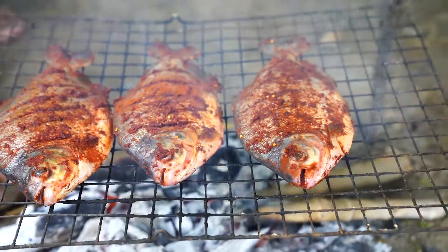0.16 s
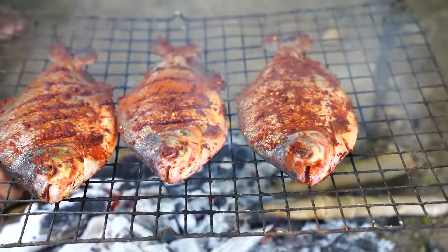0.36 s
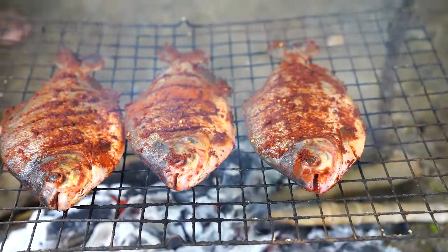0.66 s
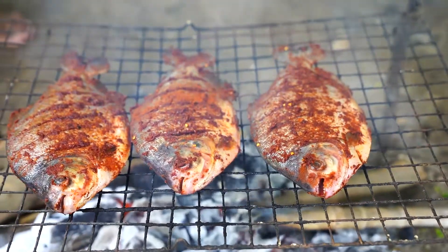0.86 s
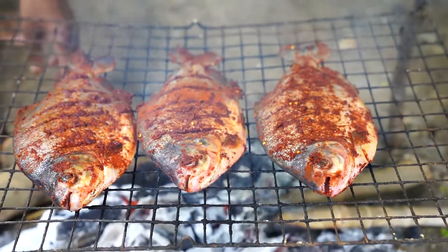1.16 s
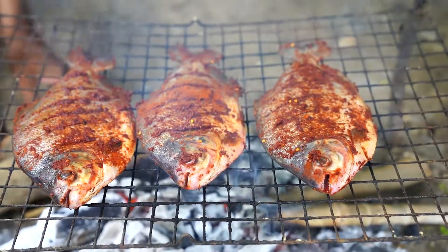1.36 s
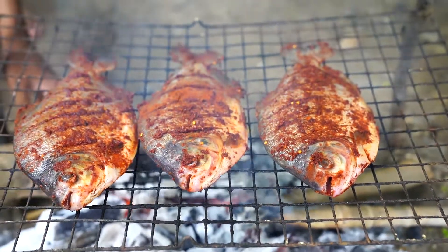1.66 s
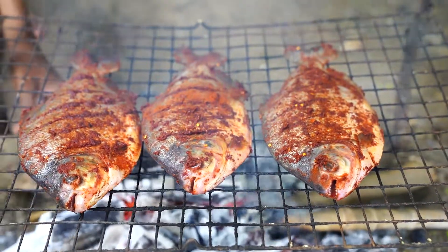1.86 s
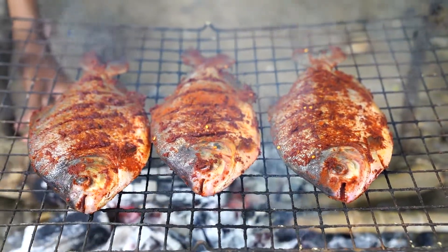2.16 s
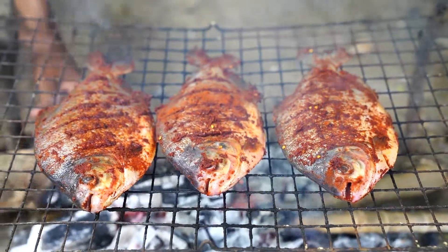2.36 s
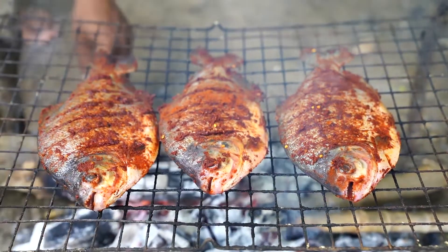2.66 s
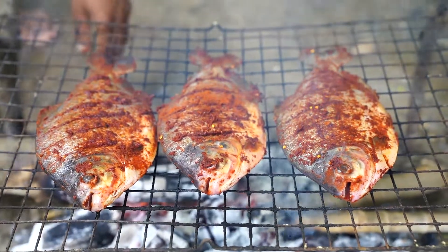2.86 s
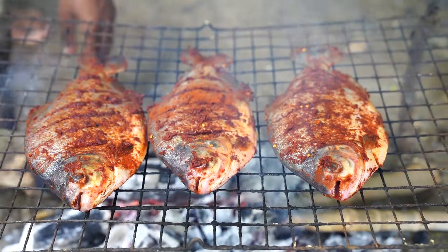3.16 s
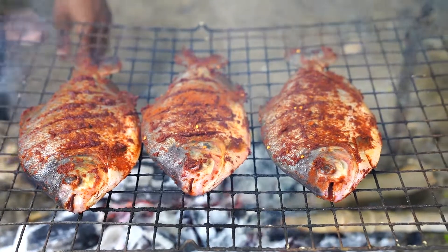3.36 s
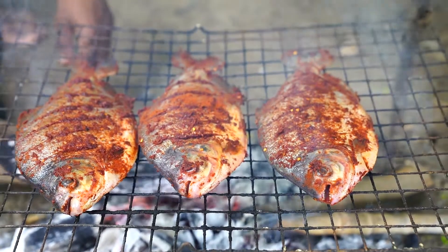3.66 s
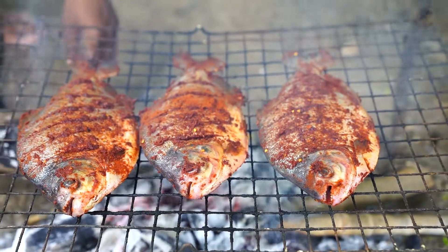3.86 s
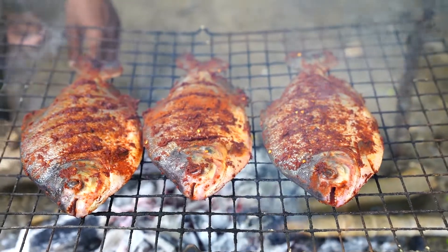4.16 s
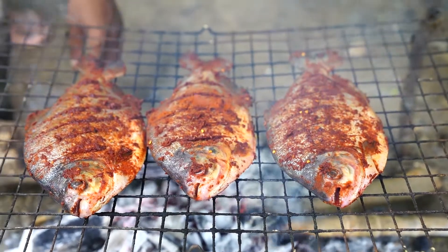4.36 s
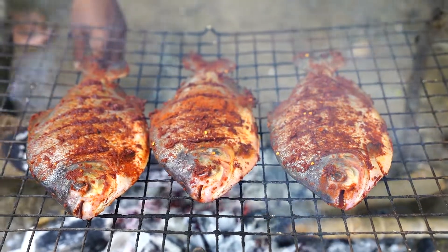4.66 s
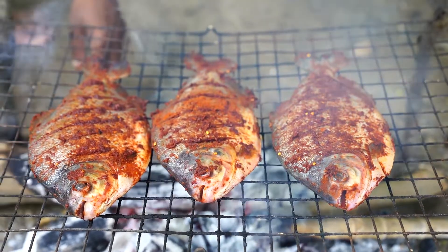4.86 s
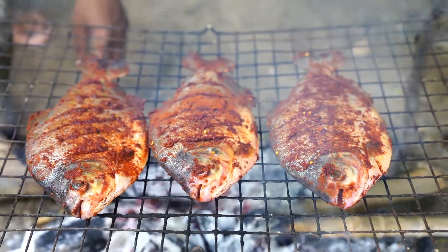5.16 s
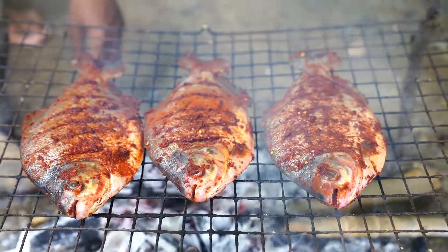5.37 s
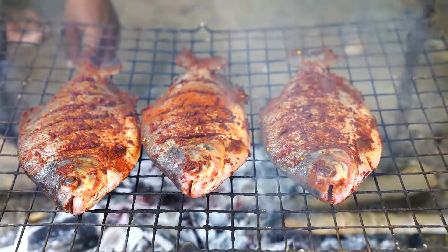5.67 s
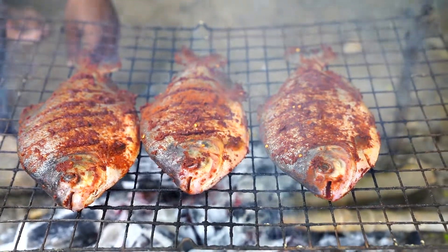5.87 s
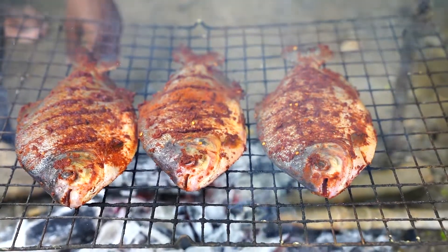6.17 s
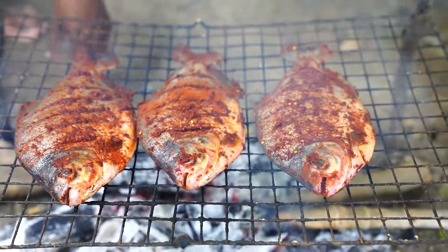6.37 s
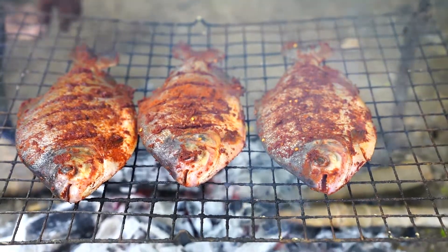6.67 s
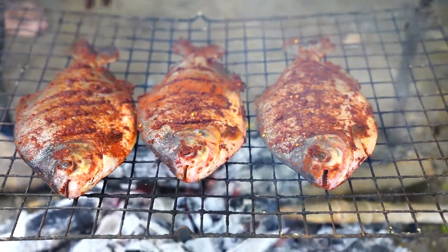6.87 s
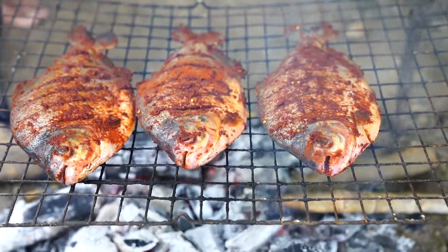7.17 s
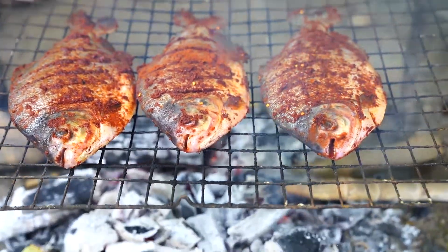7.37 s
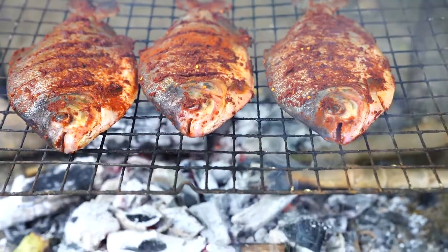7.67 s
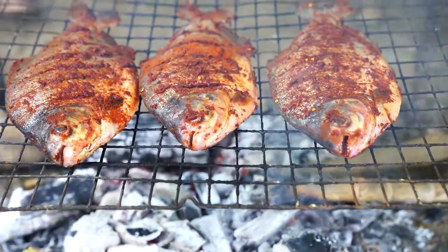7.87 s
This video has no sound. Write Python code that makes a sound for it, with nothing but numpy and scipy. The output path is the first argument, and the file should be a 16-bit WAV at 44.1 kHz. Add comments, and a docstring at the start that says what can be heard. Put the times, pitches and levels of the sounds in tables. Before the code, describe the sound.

Fish grill over charcoal outdoors with a fine, even hiss, faint ticks and scattered sharp cracks close to the microphone. After about a second someone shuffles behind the grill, soles grinding dry grit between soft thuds. Midway a foot knocks on wood, and a few more steps follow. An engine idles some way off, far motors drone, a bird whistles faintly and air rumbles on the microphone.

```python
"""A fine, even hiss and ticks come from coals and fat as fish grill over charcoal outdoors.
Air rumbles at the microphone, an engine idles some way off, far motors drone, a bird whistles faintly.
Someone shuffles behind the grill: soles grind the dry grit, steps thud, and a foot knocks on wood.
Sharp cracks and snaps come from the coals and from grit underfoot; each rings briefly."""
import sys
import numpy as np
from scipy import signal
from scipy.fft import rfft, irfft, next_fast_len
from scipy.io import wavfile
from scipy.ndimage import uniform_filter1d, map_coordinates

SR = 44100
rng = np.random.default_rng(int(sys.argv[2]) if len(sys.argv) > 2 else 0)


def wav_out(sig):
    """Save sig, one row per channel (or a flat mono array), as 16-bit PCM at SR to the path in sys.argv[1]."""
    wavfile.write(sys.argv[1], SR, np.round(np.clip(np.atleast_2d(sig).T, -1, 1) * 32767).astype(np.int16))


N = 353373


def amp(db):
    """Turn decibels into a gain."""
    return 10 ** (np.asarray(db) / 20)


def unit(x):
    """Scale x to an average strength (rms) of 1."""
    return x / np.sqrt(np.mean(x ** 2) + 1e-20)


def along(points, hz):
    """Read between (f/Hz, value) points on a log frequency axis."""
    f, v = np.transpose(points)
    return np.interp(np.log(hz + 1), np.log(f + 1), v)


def clock():
    """The time of every sample, in seconds."""
    return np.arange(N) / SR


def curves(rows):
    """Join rows of (t/s, values...) with straight lines: one curve for each value column."""
    s, *cols = np.transpose(rows)
    return [np.interp(clock(), s, c) for c in cols]


def wobble(rate):
    """A smooth random curve through `rate` points a second."""
    return map_coordinates(rng.standard_normal(int(N * rate / SR) + 4), [clock() * rate])


def filtered(x, response):
    """Filter x by a function that gives the gain at each frequency."""
    m = next_fast_len(N + SR // 2)
    return irfft(rfft(x, m) * response(np.fft.rfftfreq(m, 1 / SR)), m)[..., :N]


def coloured(x, spectrum):
    """Shape x by (f/Hz, level/dB) points, then scale it to rms 1."""
    return unit(filtered(x, lambda hz: amp(along(spectrum, hz))))


def noise(spectrum):
    """Steady noise shaped by (f/Hz, level/dB) points, at rms 1."""
    return coloured(rng.standard_normal(N), spectrum)


def resonance(f, hz, width_hz):
    """The response of something that rings near hz and falls off steeply on both sides."""
    return (1j * f * width_hz / (hz ** 2 - f ** 2 + 1j * f * width_hz)) ** 2


def ring(push, hz, width_hz):
    """Send a short push through one resonance; the result has rms 1."""
    f = np.fft.rfftfreq(len(push), 1 / SR)
    return unit(irfft(rfft(push) * resonance(f, hz, width_hz)))


def pulse(spectrum, size=8192):
    """The most sudden pulse that has the given spectrum (minimum phase)."""
    f = np.fft.rfftfreq(size, 1 / SR)
    cepstrum = irfft(np.log(amp(along(spectrum, f))))
    cepstrum[1:size // 2] *= 2
    cepstrum[size // 2 + 1:] = 0
    return irfft(np.exp(rfft(cepstrum)))


def grains(rate, spread_db):
    """Tiny random clicks of uneven size, about `rate` a second, at rms 1."""
    clicks = (rng.random(N) < rate / SR) * rng.standard_normal(N)
    return unit(clicks * amp(spread_db * rng.standard_normal(N)))


def patchy(x, depth_db):
    """Give x brief random resonances, as the points of contact change."""
    spectra = signal.stft(x, nperseg=512)[2]
    patches = uniform_filter1d(rng.standard_normal(spectra.shape), size=6, axis=0)
    patches = unit(uniform_filter1d(patches, size=5, axis=1))
    return unit(signal.istft(spectra * amp(depth_db * patches), nperseg=512)[1][:N])


def add(track, s, sound):
    """Mix a sound into a track, starting at s seconds."""
    part = track[max(round(s * SR), 0):][:len(sound)]
    part += sound[:len(part)]


def air(calm_db=-30, gust_half_s=0.15, wash_db=-44):
    """Gusts buffet the microphone over a far wash of traffic and breeze."""
    # gusts: t/s, rise over the calm/dB
    gusts = [(.4, 11), (1.2, 8), (3.12, 6), (4.6, 8), (7.28, 9), (7.82, 12)]
    # tone of the rumble at the microphone: f/Hz, level/dB
    rumble_tone = [(4, -18.5), (10, -3), (13.5, -2), (18, -12), (28, -23), (40, -27), (70, -36.5),
                   (150, -76)]
    # narrow resonances that sing in the traffic noise: f/Hz, width/Hz, level/dB
    drone_notes = [(697.6, 35, 2.5), (790, 50, -1.5), (1555, 100, -10.5)]
    # how loud they are together: t/s, level/dB
    drone_level = [(0, -67), (4, -62.5), (5.2, -65), (8, -58)]
    # tone of the far traffic and breeze: f/Hz, level/dB
    wash_tone = [(20, -5), (55, 3), (110, -1.5), (190, -2.5), (300, -6.5), (420, -15.5), (560, -17),
                 (720, -17.5), (1000, -20.5), (1500, -26), (2200, -28), (6000, -33.5)]
    gust_db = sum(db * np.exp(-((clock() - s) / gust_half_s) ** 2) for s, db in gusts)
    rumble = amp(calm_db + gust_db) * noise(rumble_tone)
    singing = lambda f: sum(amp(db) * resonance(f, hz, width) for hz, width, db in drone_notes)
    drone = amp(curves(drone_level)[0]) * unit(filtered(rng.standard_normal(N), singing))
    wash = amp(wash_db + wobble(3.41)) * noise(wash_tone)
    return rumble + wash + drone


def hiss(level_db=-49):
    """The fine, even hiss of the grill."""
    # tone of the hiss: f/Hz, level/dB
    hiss_tone = [(200, -0.5), (1500, -5.5), (4000, -1), (8000, 0), (15500, 0.5)]
    return amp(level_db) * noise(hiss_tone)


def engine(beat_db=-43, puff_db=-58, uneven_db=1.93):
    """One cylinder idles: each firing gives an exhaust beat and a soft puff of gas."""
    # idling speed: t/s, firing rate/Hz
    idle = [(0, 25.4), (3.1, 25.45), (4.1, 25.95), (5.6, 25.62), (6.5, 25.6), (7.1, 25.9), (8, 25.8)]
    # tone of one exhaust beat: f/Hz, level/dB
    exhaust = [(25, -24.5), (51, 3.5), (77, -10.5), (103, -17), (128, -5.5), (155, 1.5), (180, 4.5),
               (207, 3), (232, -11.5), (258, -9), (308, -13), (350, -29.5), (700, -27.5), (1200, -41)]
    cycles = np.cumsum(curves(idle)[0]) / SR - 0.22  # it fires at each whole number
    firings = np.diff(np.floor(cycles), prepend=np.floor(cycles[0]))
    firings *= amp(uneven_db * rng.standard_normal(N))
    beats = unit(signal.fftconvolve(firings, pulse(exhaust))[:N])
    gas = noise([(150, -33), (300, -5), (750, -14), (1500, -19), (3000, -25)])
    puffs = unit(np.exp(-2.5 * (cycles % 1)) * gas)
    drift = amp(0.8 * wobble(2))
    return drift * (amp(beat_db) * beats + amp(puff_db) * puffs)


def motor(hz, db, waver_db=4):
    """A wavering hum: only the lowest note of a motor carries this far."""
    hum = unit(np.sin(2 * np.pi * np.cumsum(hz) / SR))
    return amp(db + waver_db * wobble(4.91)) * hum


def motors(start_hz=76, climb_hz_per_s=1.3):
    """One far motor speeds up evenly; the speed of another wanders."""
    # the motor that speeds up: t/s, level/dB
    climb_level = [(0, -50.5), (2.2, -47.5), (4.4, -45.5), (5.2, -52.5), (8, -51.5)]
    # the motor that wanders: t/s, f/Hz, level/dB
    wander = [(0, 55, -57), (1.2, 69, -53), (2.1, 66.9, -44.5), (3, 62.5, -52), (5.4, 57.1, -54.5),
              (6.9, 70.1, -56), (8, 62.4, -59)]
    climbing = motor(start_hz + climb_hz_per_s * clock(), curves(climb_level)[0])
    return climbing + motor(*curves(wander))


def bird(flutter_db=2):
    """Thin whistles start firm and grow shaky as they slide upward."""
    # whistles: t/s, length/s, start f/Hz, end f/Hz, level/dB, pitch shake/Hz
    whistles = [(0.947, 0.22, 2810, 3470, -56.5, 190), (3.275, 0.27, 3070, 3420, -57, 80),
                (7.47, .2, 3300, 3380, -63, 60)]
    out = np.zeros(N)
    for s, length, start_hz, end_hz, db, shake_hz in whistles:
        n = int(length * SR)
        progress = np.linspace(0, 1, n)
        hz = start_hz + progress * (end_hz - start_hz + shake_hz * wobble(400)[:n])
        swell = np.sqrt(2 * np.abs(np.sin(np.pi * progress ** 0.7)))
        flutter = amp(flutter_db * wobble(65)[:n])
        add(out, s, amp(db) * swell * flutter * np.sin(2 * np.pi * np.cumsum(hz) / SR))
    return out


def crunch(grit, s, fade_s, hz, width_hz, size=8192):
    """A sole presses on grit for a moment, hardest at time s; returns a whole track."""
    out, t = np.zeros(N), (np.arange(size) - size // 2) / SR
    patch = ring(grit[round(s * SR):][:size], hz, width_hz)
    press = np.exp(-np.abs(t / fade_s) ** 1.5)
    add(out, s + t[0], np.sqrt(np.mean(press ** 2)) * unit(press * patch))
    return out


def steps(rise_s=0.0066, pat_db=-15, crunch_lag_s=0.0043, size=8192):
    """A footfall is a low thud, a dull pat and a crunch of grit; a scuff is the crunch alone."""
    # footfalls: t/s, thud level/dB, thud f/Hz, crunch level/dB, crunch f/Hz
    footfalls = [(1.561, -25.5, 171, -39.5, 1600), (1.682, -30.5, 138, -39.5, 3500),
                 (1.74, -24.5, 156, -48, 3000), (2.048, -29, 147, -39, 2800),
                 (2.08, -25.5, 168, -37.5, 2100), (2.194, -27.5, 140, -32, 3300),
                 (4.841, -21, 144.5, -40, 1500), (4.916, -19, 122, -38, 1700), (5.326, -26, 140, -47, 502),
                 (5.884, -17, 111, -46, 1200)]
    # scuffs of a sole with no weight on it: t/s, level/dB, fade in and out/s, f/Hz, width/Hz
    scuffs = [(1.25, -47, 0.039, 2850, 2800), (1.483, -41.5, .005, 2400, 8000),
              (1.82, -47, 0.025, 2800, 3000), (2.173, -42, 0.0095, 4500, 12000),
              (2.236, -37, 0.0084, 3560, 7070), (2.38, -38, .03, 4600, 17000),
              (3.31, -45, .018, 2200, 7000), (4.141, -38.5, 0.012, 1800, 3000),
              (4.406, -43, 0.018, 2500, 6000), (4.511, -43, 0.011, 2720, 7000),
              (4.838, -28.5, 0.0073, 1600, 11000), (5.832, -44, 0.054, 800, 2800),
              (5.866, -37, 0.011, 1700, 5900)]
    out, t = np.zeros(N), np.arange(size) / SR
    grit = coloured(grains(rate=7500, spread_db=2.5), [(4000, 3.5), (8000, -1), (15000, -6.5)])
    grit = patchy(grit, depth_db=3.5)
    weight = t / rise_s * np.exp(1 - t / rise_s)
    for s, thud_db, thud_hz, crunch_db, crunch_hz in footfalls:
        pat = amp(pat_db) * ring(rng.standard_normal(size), hz=225, width_hz=180)
        add(out, s, amp(thud_db) * weight * (np.sin(2 * np.pi * thud_hz * t) + pat))
        out += amp(crunch_db) * crunch(grit, s + crunch_lag_s, 0.011, crunch_hz, width_hz=11600)
    for s, db, fade_s, hz, width_hz in scuffs:
        out += amp(db) * crunch(grit, s, fade_s, hz, width_hz)
    return out


def shuffle(attack_s=0.011, release_s=0.016, flutter_db=2):
    """Grit rolls in uneven clumps under sliding soles; each slide swells or eases, then stops."""
    # slides over dry ground: t/s, length/s, starting level/dB, change over the slide/dB
    slides = [(1.318, 0.4, -52, 9.5), (1.698, 0.38, -54, 6), (1.788, 0.14, -47.5, 1.5),
              (2.032, .395, -45.5, 4), (2.43, 0.33, -51, -3.5), (3.204, 0.23, -49, -5),
              (4.152, 0.364, -52, 0.5), (4.85, 0.252, -50, 0.5), (5.186, .14, -49.5, -3),
              (5.564, 0.36, -51.5, 2.5), (6.073, 0.2, -58, 6.5)]
    # tone of the rolling grit: f/Hz, level/dB
    grit_tone = [(200, -12), (350, 0.5), (700, 2), (1200, -1), (2200, -1), (4000, -3.5), (7000, -3.5),
                 (11000, -10.5), (15500, -13.5)]
    level = np.zeros(N)
    for s, length, db, swell_db in slides:
        t = clock() - s
        gate = np.interp(t, [0, attack_s, length, length + release_s], [0, 1, 1, 0])
        level += gate * amp(db + swell_db * np.clip(t / length, 0, 1))
    grit = patchy(coloured(grains(rate=5000, spread_db=2), grit_tone), depth_db=2)
    return level * amp(flutter_db * wobble(70)) * grit


def crack(hz, width_hz, splinter=0.34, splinter_s=0.011, scatter_s=0.068, scatter_db=-11, size=4096):
    """A bit of coal or grit snaps, splinters and rings briefly; things nearby scatter the sound."""
    t = np.arange(size) / SR
    snap = ring(t == 0, hz, width_hz)
    splinters = ring(rng.standard_normal(size) * amp(-60 * t / splinter_s), hz, width_hz)
    scatter = ring(rng.standard_normal(size) * amp(-60 * t / scatter_s), hz, width_hz)
    sound = np.sqrt(1 - splinter) * snap + np.sqrt(splinter) * splinters + amp(scatter_db) * scatter
    return unit(sound) * np.sqrt(0.002 * SR / size)  # as much energy as 2 ms at rms 1


def crackle(overtone_ratio=1.63, puff_db=-16, tick_count=36, tick_db=-51, tick_hz=6500, sizzle_db=-60):
    """Sharp cracks from the coals and from grit underfoot, faint ticks and a thin sizzle of fat."""
    # snaps of coal or grit: t/s, level/dB, f/Hz, width/Hz, share of splinters (0-1), overtone level/dB
    snaps = [(1.6976, -27, 7500, 24000, 0.7, -16), (1.9128, -38, 5000, 9000, .5, -20),
             (2.5636, -39, 4460, 3500, 0.2, -20), (2.644, -42, 4000, 9000, .4, -20),
             (2.6723, -24, 5600, 11500, 0.03, -34), (3.0306, -35, 3100, 450, 0.4, -30),
             (3.8076, -39.5, 7500, 350, 0.4, -30), (3.9405, -41, 12400, 2500, .5, -30),
             (4.0912, -37.5, 4300, 750, .3, -11), (4.1279, -36.5, 1340, 900, 0.7, -13),
             (4.4089, -32, 2900, 6960, 0.4, -16), (4.7672, -40.5, 5230, 6000, 0.3, 4),
             (4.978, -40, 6000, 5000, .6, -20), (5.3775, -40.5, 5040, 2000, .4, 1),
             (5.7393, -28, 4500, 2800, .3, -10), (5.7805, -34.5, 1400, 2800, 0.9, -24),
             (6.2170, -35, 3180, 13000, 1, -18), (6.2768, -44, 5500, 8000, .6, -14),
             (6.5503, -30.5, 4570, 1600, 0.5, 2.5), (7.7100, -23, 3350, 2800, 0.03, -35),
             (7.721, -37, 3100, 2200, 0.6, -20)]
    out = np.zeros(N)
    for s, db, hz, width_hz, splinter, overtone_db in snaps:
        note = crack(hz, width_hz, splinter)
        overtone = amp(overtone_db) * crack(overtone_ratio * hz, width_hz, splinter)
        damping = min(width_hz / hz, 2)  # the less a crack rings, the more it puffs
        puff = amp(puff_db) * damping * crack(hz=650, width_hz=1100)
        add(out, s, amp(db) * (note + overtone + puff))
    tick_times = rng.random(tick_count) * N / SR
    for s, (strength, pitch) in zip(tick_times, rng.standard_normal((tick_count, 2))):
        tick = crack(tick_hz * np.exp(0.4 * pitch), width_hz=2500)
        add(out, s, amp(tick_db + 0.85 * strength) * tick)
    sizzle = coloured(grains(rate=420, spread_db=8.5), [(1500, 9.5), (5000, -35), (15000, 17)])
    return out + amp(sizzle_db) * sizzle


def knock(contact_s=0.011, rough_db=-20, size=4096):
    """A foot strikes wood: the short, gritty contact makes it ring briefly."""
    # contacts of the foot: t/s, level/dB
    knocks = [(4.8350, -26), (4.8392, -31)]
    # resonances of the wood: f/Hz, width/Hz, level/dB
    wood = [(406, 530, 9.5), (740, 260, 10), (1100, 250, 2), (1600, 300, -6), (2000, 280, -10),
            (2900, 400, -2), (4100, 270, 9.5)]
    out, t, f = np.zeros(N), np.arange(size) / SR, np.fft.rfftfreq(size, 1 / SR)
    body = sum((-1) ** k * amp(db) * resonance(f, hz, width) for k, (hz, width, db) in enumerate(wood))
    for s, db in knocks:
        contact = (t == 0) + amp(rough_db - 60 * t / contact_s) * rng.standard_normal(size)
        sound = unit(irfft(rfft(contact) * body))
        add(out, s, amp(db) * sound * np.sqrt(0.005 * SR / size))  # level as if packed into 5 ms
    return out


def scene(side_hiss_db=-57.5, reflection_db=-22):
    """All sits in the middle; hiss and a ground reflection of the near sounds add a little width."""
    near = crackle() + shuffle() + steps() + knock()
    mid = near + engine() + motors() + bird() + air() + hiss()
    side_hiss = noise([(300, -6), (700, -4), (2000, -9), (5000, -5.5), (9000, -4), (15500, -2.5)])
    reflection = np.roll(near, SR // 300)  # 3.3 ms late
    side = amp(side_hiss_db) * side_hiss + amp(reflection_db) * reflection
    bass_cut = signal.butter(10, 310, "high", fs=SR, output="sos")  # keeps the bass in the middle
    side = signal.sosfilt(bass_cut, side)
    return np.array([mid + side, mid - side])


def record(dry):
    """Cut off the very highest treble, above 15900 Hz."""
    return filtered(dry, lambda hz: hz < 15900)


dry = scene()
out = record(dry)
wav_out(out)
```